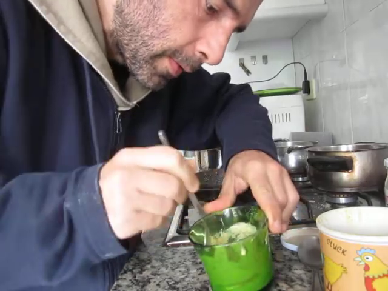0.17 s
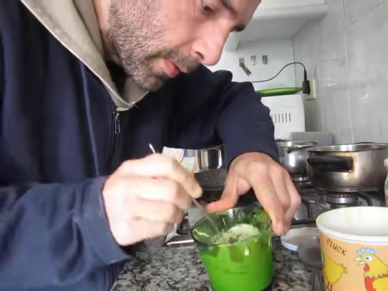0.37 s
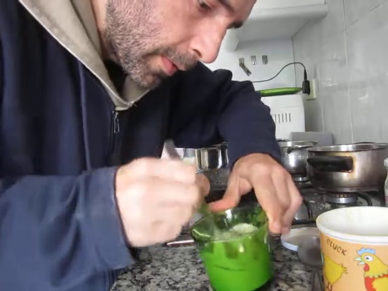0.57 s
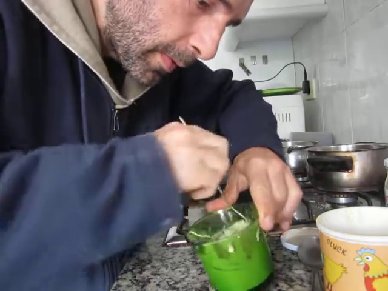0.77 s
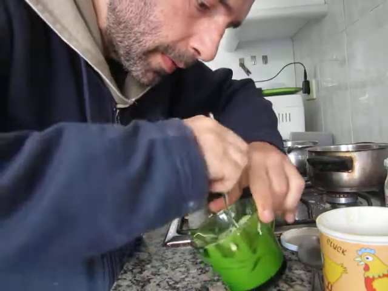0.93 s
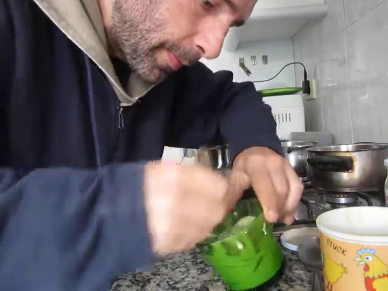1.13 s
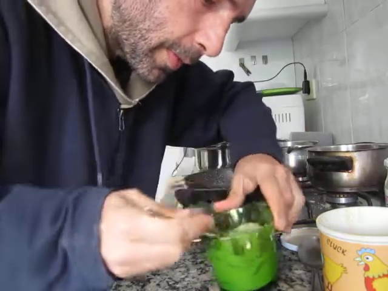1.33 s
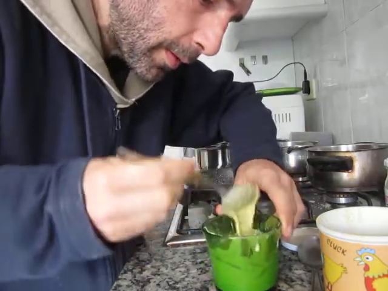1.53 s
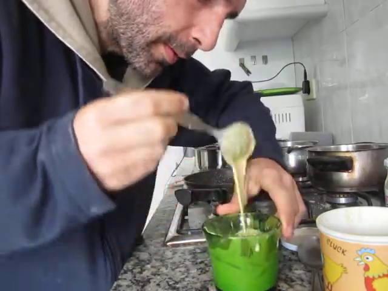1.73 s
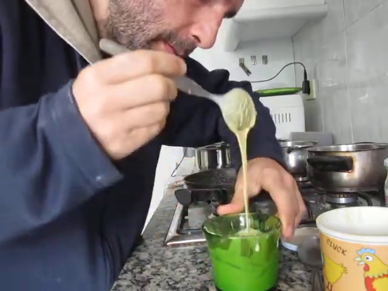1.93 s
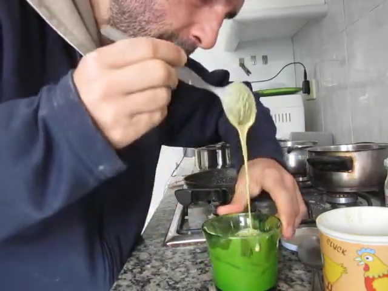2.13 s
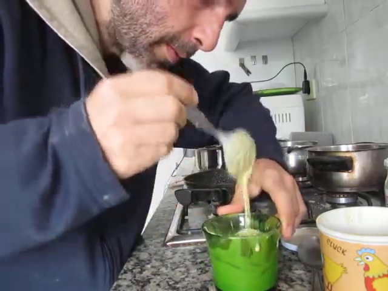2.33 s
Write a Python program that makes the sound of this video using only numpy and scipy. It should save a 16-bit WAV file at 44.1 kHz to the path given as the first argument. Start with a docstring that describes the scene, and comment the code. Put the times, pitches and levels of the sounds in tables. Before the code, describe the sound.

Quick stirring of sticky batter, the spoon rubbing and clicking against a damped cup, little air pockets popping, a brief suck as it pulls free and one dull knock; close, mono, small kitchen, quiet hum after.

```python
"""A metal spoon beats thick batter in a plastic cup: stick-slip clicks ring the cup's moving hollow,
scrape its wall and fizz with torn batter and bursting bubbles; air pockets plop and the spoon sucks free.
Knocks and light ticks are damped mode clusters of cup and spoon; the last knock is dull.
Quick echoes and a short room tail follow; noise, hum bands and a thin vibrato whine run throughout."""
import sys
import numpy as np
from scipy import signal
from scipy.fft import rfft, irfft
from scipy.io import wavfile
from scipy.ndimage import uniform_filter1d

SR = 44100
rng = np.random.default_rng(int(sys.argv[2]) if len(sys.argv) > 2 else 0)


def master(y):
    """Save y as 16-bit WAV."""
    cut = np.clip(np.atleast_2d(y).T, -1, 1)
    pcm = np.round(cut * 32767)  # scale
    wavfile.write(sys.argv[1], SR, pcm.astype(np.int16))


N = 105840  # samples


def amp(db):
    """dB to amplitude."""
    return 10 ** (np.asarray(db) / 20)


def unit(x):
    """Scales to rms 1."""
    return x / np.sqrt(np.mean(x ** 2) + 1e-20)


def read(points, hz):
    """Interpolates a table on a log-frequency axis."""
    freq_hz, value = np.transpose(points)
    return np.interp(np.log(hz + 1), np.log(freq_hz + 1), value)


def add(mix, start_s, sound):
    """Mixes a sound in place, cropped at the end."""
    part = mix[round(start_s * SR):][:len(sound)]
    part += sound[:len(part)]


def colour(x, points, size=4096):
    """Minimum-phase filter with the given dB spectrum."""
    gain_db = read(points, abs(np.fft.fftfreq(size, 1 / SR)))
    log_gain = np.log(amp(gain_db))
    response = np.exp(np.conj(signal.hilbert(log_gain)))
    taps = np.fft.ifft(response).real[:size // 2]
    return signal.fftconvolve(x, taps)[:len(x)]


def cut(x, hz, kind, order=2):
    """Butterworth low-pass or high-pass."""
    return signal.sosfilt(signal.butter(order, hz, kind, fs=SR, output="sos"), x)


def resonate(x, hz, width_hz):
    """One-pole resonance in a frame rotating with the curve hz."""
    turn = np.exp(2j * np.pi * np.cumsum(hz) / SR)
    r = np.exp(-np.pi * width_hz / SR)
    return 2 * (turn * signal.lfilter([1 - r], [1, -r], x / turn)).real


def slips(per_s, spread_db):
    """Random stick-slip clicks of uneven size and either sign."""
    size = amp(spread_db * np.minimum(rng.exponential(1, N), 3))
    hit = rng.random(N) < per_s / SR
    return size * rng.choice([-1, 1], N) * hit


def burst(t60_s, points):
    """A dense, fast-dying cluster of modes: decaying random signs, coloured, level-normalised."""
    t = np.arange(SR // 8) / SR
    x = colour(rng.choice([-1., 1.], len(t)) * amp(-60 * t / t60_s), points)
    return x / np.sqrt(np.sum(x ** 2) / (t60_s * SR)) / 10


# room air colour: freq_hz, shape_db
AIR_COLOUR = [(25, -12), (75, -5.5), (140, -3), (200, -9.5), (400, -9.5), (700, -12), (1200, -14),
              (2400, -21.5), (4200, -22.5), (6000, -27), (7400, -28.5), (9000, -31.5), (12000, -36.5),
              (16000, -40)]
# appliance hum and whine bands: centre_hz, width_hz (at half amplitude), level_db
HUM_BANDS = [(246.8, 8.5, -60.5), (288.4, 6.4, -69), (351, 8.1, -67.5), (546.5, 8.9, -65),
             (4916, 300, -67.5), (7800, 600, -76.5), (14650, 620, -74.5)]
AIR_DB = -54.5
WHINE_HZ, WHINE_DB, WHINE_SWING_HZ, WHINE_VIBRATO_HZ = 7863, -67, 26, 30


def background():
    """Coloured air noise, narrow noise bands of an appliance and a tone with fast, slight vibrato."""
    hz, t = np.fft.rfftfreq(N, 1 / SR), np.arange(N) / SR
    air_spectrum = rfft(rng.standard_normal(N)) * amp(read(AIR_COLOUR, hz))
    out = amp(AIR_DB) * unit(irfft(air_spectrum, N))
    for centre_hz, width_hz, level_db in HUM_BANDS:
        phases = np.exp(2j * np.pi * rng.random(len(hz)))
        band = phases / (1 + (2 * (hz - centre_hz) / width_hz) ** 2)
        out += amp(level_db) * unit(irfft(band, N))
    whine_hz = WHINE_HZ + WHINE_SWING_HZ * np.sin(2 * np.pi * WHINE_VIBRATO_HZ * t)
    whine = np.sin(2 * np.pi * np.cumsum(whine_hz) / SR)
    return out + amp(WHINE_DB) * unit(whine)


# decay of the small tiled room: freq_hz, t60_s
ROOM_DECAY = [(150, 0.41), (1000, 0.33), (2500, 0.35), (4000, 0.26), (7000, 0.14), (15000, 0.24)]
ROOM_DB, ECHO_DB = -13, -12


def kitchen(x):
    """Quick dense echoes from counter and hands, then a sparse room tail decaying per frequency."""
    t = np.arange(SR // 2) / SR
    hit = rng.random(len(t)) < 4000 / SR  # reflections per second
    taps = rng.choice([-1., 1.], len(t)) * hit * (t > .007)
    hz, when_s, z = signal.stft(taps, SR, nperseg=256)
    decay = amp(-60 * when_s / read(ROOM_DECAY, hz)[:, None])
    tail = signal.istft(z * decay, SR, nperseg=256)[1][:len(t)]
    early = rng.standard_normal(len(t)) * (t > .002) * np.exp(-t / 0.0023)
    room = amp(ROOM_DB) * tail / np.linalg.norm(tail)
    echo = amp(ECHO_DB) * early / np.linalg.norm(early)
    return signal.fftconvolve(x, room + echo)[:N]


# air pockets popping in the batter: start_s, level_db, pitch_hz
PLOPS = [(.432, -26.5, 1079), (.448, -26.5, 1072), (.459, -28, 1064), (.470, -29, 1112), (.500, -31, 1067),
         (.549, -24, 1088), (.564, -29.5, 1017), (.587, -32, 938), (.7625, -28.5, 1042), (.931, -40, 600),
         (.954, -32.5, 588), (.961, -29, 938), (1.147, -27.5, 924), (1.424, -35, 1010)]
PLOP_RISE_S, PLOP_T60_S = 0.0024, 0.027


def plops():
    """Each air pocket swells quickly and rings as a sine, damped by the batter."""
    out, t = np.zeros(N), np.arange(SR // 10) / SR
    shape = (1 - np.exp(-t / PLOP_RISE_S)) ** 2 * amp(-60 * t / PLOP_T60_S)
    shape /= shape.max()
    for start_s, level_db, pitch_hz in PLOPS:
        add(out, start_s, amp(level_db) * shape * np.sin(2 * np.pi * pitch_hz * t))
    return out


# modes of the batter-filled cup: freq_hz, level_db (relative), t60_s
CUP_MODES = [(342.5, -18, 0.056), (630, -16.5, 0.034), (827, -17, 0.048), (964, -1.5, 0.025),
             (1153, 1, 0.026), (1566, -5, 0.021), (1914, -15.5, 0.046), (2423, -1, 0.015),
             (2836, -4.5, 0.021), (3120, -5, 0.022), (3580, -12, 0.02), (3880, -16, 0.024),
             (4250, -16, 0.0094)]


def cup_ring(pitch):
    """The cup's short, batter-damped modes with alternating signs, peak 1."""
    t = np.arange(SR // 8) / SR
    ring = np.zeros(len(t))
    for k, (freq_hz, level_db, t60_s) in enumerate(CUP_MODES):
        mode = amp(level_db - 60 * t / t60_s) * np.cos(2 * np.pi * freq_hz * pitch * t)
        ring += mode * (-1) ** k
    return ring / abs(ring).max()


# light spoon ticks and batter snaps: start_s, level_db, centre_hz, half_width_octaves (at -6 dB), t60_s
TICKS = [(.324, -29.5, 3400, 0.62, 0.019), (0.343, -29.5, 4900, 0.65, 0.031),
         (0.387, -33.5, 7000, 0.96, .015), (.4498, -14, 3010, 0.19, 0.018),
         (0.4498, -23.5, 5560, 0.37, 0.037), (0.501, -32, 3460, 0.88, 0.012),
         (0.5865, -19.5, 3520, 0.42, 0.02), (0.781, -30, 10000, .4, 0.017), (.8403, -22, 7200, 0.36, 0.011),
         (.865, -28, 4800, .3, 0.022), (1.150, -25.5, 3170, 0.28, 0.03), (1.3035, -22.5, 3260, 0.18, 0.02),
         (1.324, -19.5, 3100, 0.18, 0.01), (1.3349, -18.5, 3240, 0.19, 0.017)]
TICK_CUP_DB = -14.5  # cup ring, relative to the tick's level
TICK_TOP_HZ = 10000  # upper limit of the ticks' treble


def ticks():
    """Light touches: a band-shaped burst that barely stirs the cup."""
    out, hz = np.zeros(N), np.geomspace(200, 18000, 60)
    for start_s, level_db, centre_hz, half_width_octaves, t60_s in TICKS:
        offset = np.log2(hz / centre_hz) / half_width_octaves
        shape_db = -20 * np.log10(1 + offset ** 2)
        touch = burst(t60_s, np.c_[hz, shape_db]) + amp(TICK_CUP_DB) * cup_ring(1)
        add(out, start_s, amp(level_db) * touch)
    return cut(out, TICK_TOP_HZ, "low", order=4)


# bare spoon colour: freq_hz, gain_db (before the knock's tilt)
SPOON_COLOUR = [(800, -46), (2200, -7), (3200, -2), (4300, -2.5), (5200, 8), (6050, 2), (6900, 6),
                (7300, -5.5), (8200, 2.5), (9300, -3), (10500, -13), (13000, -23), (16000, -32)]
METAL_T60_S, METAL_PIVOT_HZ, SNAP_DB = .018, 5000, 7.5


def metal_tick(tilt_db_per_octave):
    """The bare spoon's sharp snap (a coloured impulse) and short ring."""
    hz, gain_db = np.transpose(SPOON_COLOUR)
    points = np.c_[hz, gain_db + tilt_db_per_octave * np.log2(hz / METAL_PIVOT_HZ)]
    ring = burst(METAL_T60_S, points)
    return ring + amp(SNAP_DB) * colour(signal.unit_impulse(len(ring)), points)


# the cup's hollow as the spoon moves: time_s, resonance_hz, ringing_db, dull_db
HOLLOW_PATH = [(0, 970, 0.5, -10.5), (0.199, 1253, -5.5, -23), (.33, 1120, -7, -1), (.46, 1045, -1, -17.5),
               (.6, 1023, -2, -11), (0.801, 1180, -11.5, 0), (.96, 1048, -3.5, -7.5), (1.12, 900, -0.5, -8),
               (1.22, 1062, .5, -6), (1.35, 1075, -5.5, -10)]


def hollow(s):
    """Resonance in Hz, ringing level and dull level in dB of the cup's hollow at time s."""
    when_s, *columns = np.transpose(HOLLOW_PATH)
    return [np.interp(s, when_s, column) for column in columns]


# knocks on the cup: start_s, level_db (before doubling), bright_hz (low-pass), low_cut_hz, pitch_factor,
# metal_db, metal_tilt_db_per_octave, hollow_db, thump_db
KNOCKS = [(0.2043, -14, 5600, 880, 1.03, -18, -2.5, -24, -33),
          (0.764, -29.5, 9000, 1000, 1, -16.5, 4.5, -34, -70),
          (0.8043, -12.5, 7000, 295, 1.0, -10.5, -2, -38, -33),
          (1.5067, -8.5, 3300, 358, 0.95, -64, 0, -26, -29)]
# counter thump colour: freq_hz, gain_db
THUMP_COLOUR = [(30, -28), (75, -2.5), (130, -12.5), (230, -6), (340, 4), (480, -11.5), (1500, -42.5)]
# contact crack colour: freq_hz, gain_db
CRACK_COLOUR = [(300, -18), (700, 7), (1050, -2), (2000, -2), (3000, -26), (4000, -1), (5200, -3.5),
                (12000, -40)]
CRACK_DB, CRACK_T60_S = -10.5, .032  # level relative to the cup ring
HOLLOW_T60_S, THUMP_T60_S = 0.1, 0.17


def knocks():
    """Spoon meets cup: wall modes, a crack, a metal tick, the hollow's ring and a counter thump."""
    out, t = np.zeros(N), np.arange(SR // 4) / SR
    for start_s, level_db, bright_hz, low_cut_hz, pitch, metal_db, tilt_db, hollow_db, thump_db in KNOCKS:
        blow = cup_ring(pitch) + amp(CRACK_DB) * burst(CRACK_T60_S, CRACK_COLOUR)
        blow = cut(blow, bright_hz, "low", order=4)
        blow = cut(blow, low_cut_hz, "high")
        add(out, start_s, 2 * amp(level_db) * blow)
        add(out, start_s, amp(metal_db) * metal_tick(tilt_db))
        hollow_hz = hollow(start_s)[0]
        add(out, start_s, amp(hollow_db - 60 * t / HOLLOW_T60_S) * np.sin(2 * np.pi * hollow_hz * t))
        add(out, start_s, amp(thump_db) * burst(THUMP_T60_S, THUMP_COLOUR))
    return out


# colour as the spoon sucks free of the batter: freq_hz, gain_db
SUCK_COLOUR = [(1200, -19), (1830, 5.5), (2200, -21), (2700, -12), (3200, 4), (3800, -7.5), (4600, -15),
               (6000, -31), (9000, -26), (11000, -26), (12500, -34), (15000, -42)]
SUCK_S, SUCK_WIDTH_S, SUCK_DB = 1.342, .013, -37  # centre, Gaussian sigma, level at centre


def suck():
    """The spoon sucks free of the batter: a brief Gaussian swell of coloured slips."""
    t = np.arange(N) / SR
    swell = np.exp(-((t - SUCK_S) / SUCK_WIDTH_S) ** 2 / 2)
    return amp(SUCK_DB) * swell * unit(colour(slips(per_s=1500, spread_db=-0.5), SUCK_COLOUR))


BUBBLES_PER_S, BUBBLE_CYCLES = 600, 4.5  # rate over all pitches; cycles to decay by 1/e
BUBBLE_LOW_HZ, BUBBLE_HIGH_HZ, BUBBLE_TILT_DB_PER_OCTAVE = 2460, 11700, -2.5


def bubbles(count=28):
    """Tiny bubbles burst in torn batter, each ringing a few cycles at one of count pitches; rms 1."""
    out, t = np.zeros(N), np.arange(SR // 80) / SR
    for hz in np.geomspace(BUBBLE_LOW_HZ, BUBBLE_HIGH_HZ, count):
        gain = amp(BUBBLE_TILT_DB_PER_OCTAVE * np.log2(hz / BUBBLE_LOW_HZ))
        ping = gain * np.sin(2 * np.pi * hz * t) * np.exp(-t * hz / BUBBLE_CYCLES)
        out += signal.oaconvolve(slips(BUBBLES_PER_S / count, spread_db=4), ping)[:N]
    return unit(out)


# wet fizz colour: freq_hz, gain_db
FIZZ_COLOUR = [(2500, -22.5), (4300, -5.5), (5200, 4.5), (6500, 2.5), (7400, -0.5), (9000, -7.5),
               (10000, -16), (12000, -12), (13000, -33), (16000, -37)]
CLUMP_DB, CLUMP_S = 2.5, .009  # rms level swing, averaging time
FIZZ_DB, BUBBLE_DB = -3, -5


def wet_fizz():
    """Batter tears in clumps: dense slips with a wandering level, plus bubbles."""
    wander = unit(uniform_filter1d(rng.standard_normal(N), round(CLUMP_S * SR)))
    clumps = amp(CLUMP_DB * wander)
    wet = unit(colour(clumps * slips(per_s=4000, spread_db=3.5), FIZZ_COLOUR))
    return amp(FIZZ_DB) * wet + amp(BUBBLE_DB) * bubbles()


STEADY = .6  # how far the rub's random level swings are flattened, 0-1


def evened(x, size=700):
    """Flattens slow chance swells by dividing by a power of the running energy; rms 1."""
    energy = abs(uniform_filter1d(x ** 2, size)) + 1e-9
    return unit(x / energy ** (STEADY / 2))


# dull wall colour: freq_hz, gain_db
WALL_COLOUR = [(150, -38.5), (420, -19), (600, -11), (900, 5), (1250, -3.5), (1520, 5.5), (1800, -10.5),
               (3000, -42.5)]
RUB_WIDTH_HZ = 150  # each of two resonators


def wall_rub():
    """The spoon judders along the wall: slips ring the moving hollow over a dull wall body."""
    hz, ringing_db, dull_db = hollow(np.arange(N) / SR)
    judder = slips(per_s=720, spread_db=1.5)
    once = resonate(judder, hz, RUB_WIDTH_HZ)
    ringing = evened(resonate(once, hz, RUB_WIDTH_HZ))
    dull = unit(colour(slips(per_s=1000, spread_db=2), WALL_COLOUR))
    return amp(ringing_db) * ringing + amp(dull_db) * dull


# one table per stroke: time_s, rub_db, scrape_db, fizz_db (gains on the three layers)
STROKES = [
    [(0, -36.5, -40.5, -52.5), (.015, -37, -41.5, -52), (.04, -45.5, -50, -56), (.1, -54, -61, -88),
     (.19, -94, -97, -87)],
    [(.27, -38, -65, -56.5), (.32, -47.5, -42.5, -53), (.39, -44, -48, -49), (.435, -35, -38, -47.5),
     (.46, -35, -35.5, -65), (.485, -40, -46.5, -59.5), (.555, -31.5, -47, -52), (.605, -39, -47, -65),
     (.64, -59, -56.5, -73), (.73, -71, -78, -79), (.77, -46, -65, -50)],
    [(.83, -36.5, -64, -54), (.858, -42, -49, -45.5), (.875, -41, -34.5, -43), (.92, -37, -42.5, -39.5),
     (.935, -31, -40, -49), (.967, -29.5, -37.5, -54), (.98, -40.5, -51, -64)],
    [(1.012, -50, -52, -66), (1.036, -47, -43, -53), (1.095, -36.5, -38, -54.5), (1.147, -36, -38, -55.5),
     (1.175, -32, -41.5, -57.5), (1.2, -36, -41, -57), (1.24, -36, -51.5, -60), (1.27, -43, -57, -66)],
    [(1.285, -51, -50, -54), (1.3, -46, -43, -53), (1.318, -50, -45, -60), (1.338, -40.5, -40, -57),
     (1.372, -41.5, -52, -68), (1.41, -52, -66, -77), (1.456, -58, -65, -75), (1.495, -46.5, -74, -64),
     (1.52, -63, -75, -79)],
]
# scrape colour: freq_hz, gain_db
SCRAPE_COLOUR = [(600, -23), (1400, -19.5), (1850, -3), (2350, 5.5), (2750, -3.5), (3250, 0), (3750, -8),
                 (4600, -7.5), (7000, -43.5)]
SCRAPE_DB = -3


def stirring():
    """The spoon rubs the wall, scrapes and tears batter, each layer following the strokes' levels."""
    time_s, *levels_db = np.vstack(STROKES).T
    t = np.arange(N) / SR
    rub, scrape, fizz = (amp(np.interp(t, time_s, db, right=-120)) for db in levels_db)
    grit = amp(SCRAPE_DB) * unit(colour(slips(per_s=1600, spread_db=3), SCRAPE_COLOUR))
    return rub * wall_rub() + scrape * grit + fizz * wet_fizz() + suck()


def scene():
    """Cup and spoon, their room response and the background, one channel."""
    near = knocks() + ticks() + plops() + stirring()
    return (near + kitchen(near) + background())[None]


EDGE_HZ = 16100


def record(dry):
    """The microphone's band limit: a linear-phase low-pass."""
    taps = signal.firwin(255, EDGE_HZ, window=("kaiser", 9), fs=SR)
    return signal.oaconvolve(dry, taps[None], "same")


dry = scene()
out = record(dry)
master(out)
```